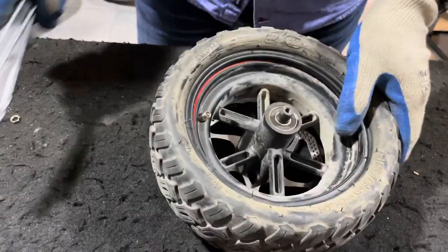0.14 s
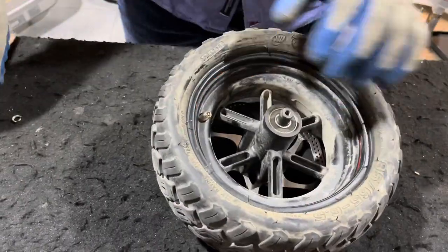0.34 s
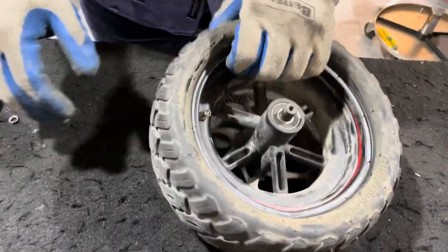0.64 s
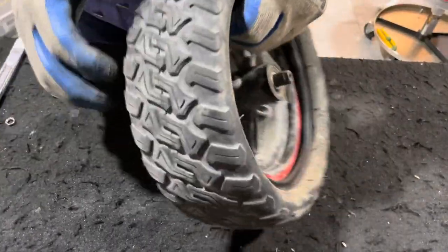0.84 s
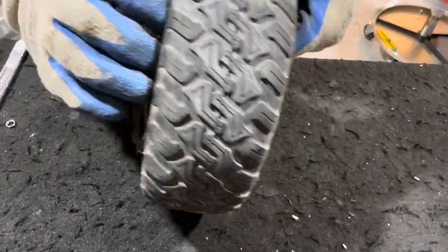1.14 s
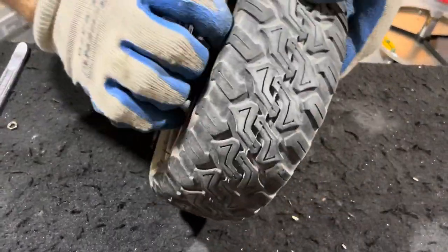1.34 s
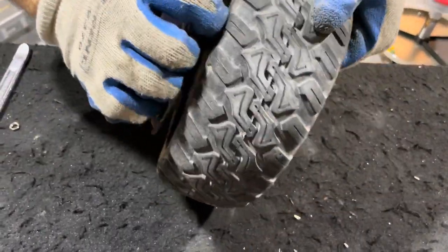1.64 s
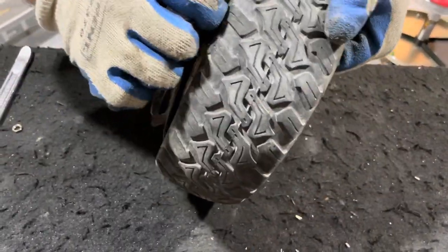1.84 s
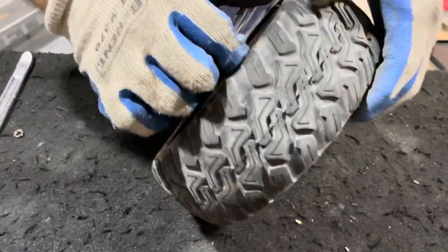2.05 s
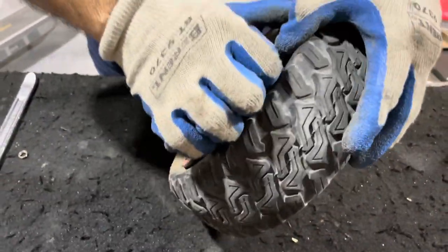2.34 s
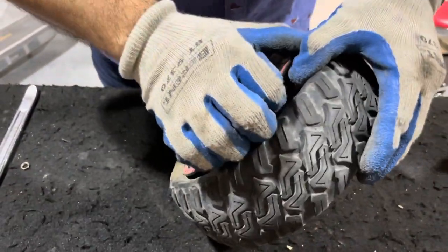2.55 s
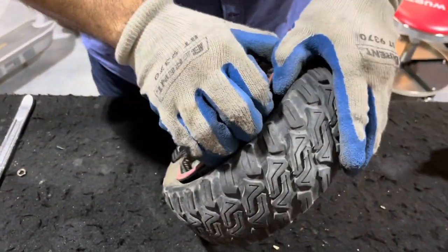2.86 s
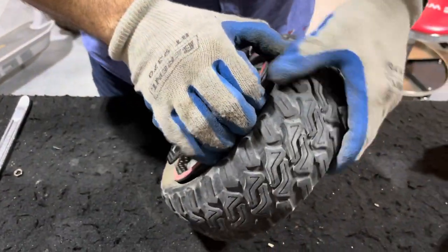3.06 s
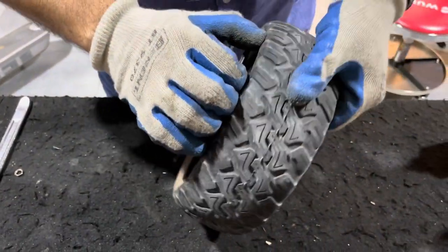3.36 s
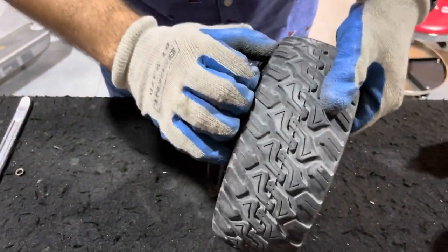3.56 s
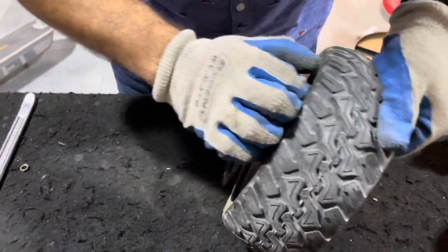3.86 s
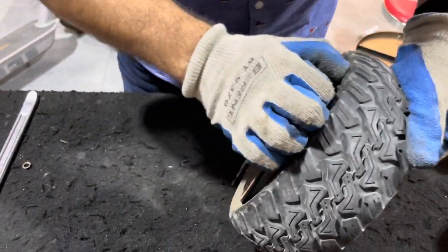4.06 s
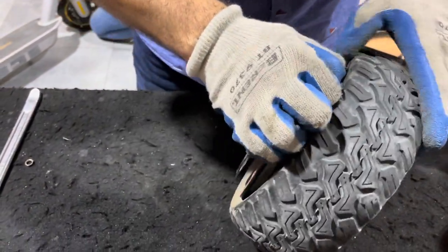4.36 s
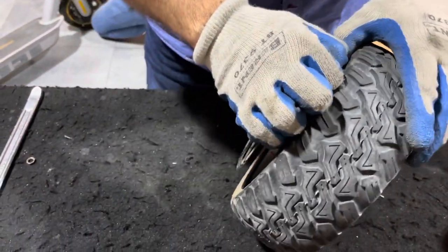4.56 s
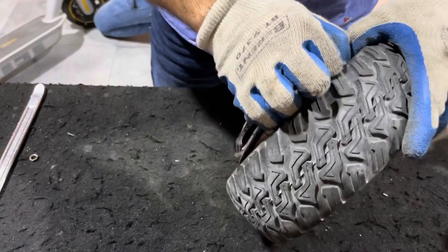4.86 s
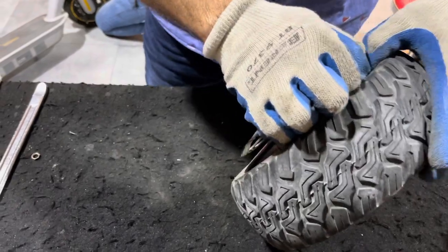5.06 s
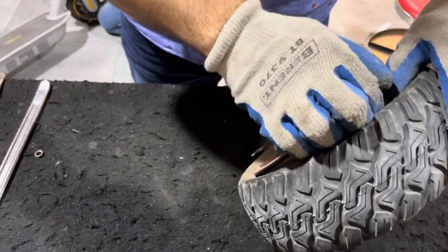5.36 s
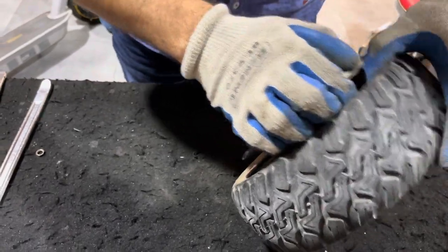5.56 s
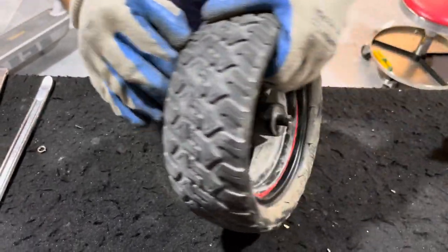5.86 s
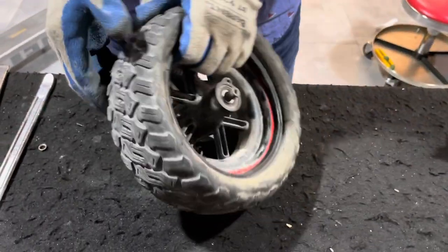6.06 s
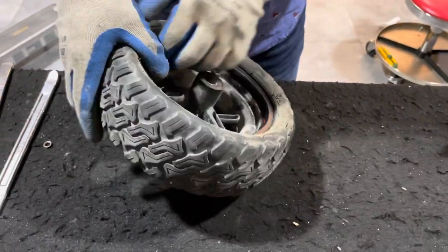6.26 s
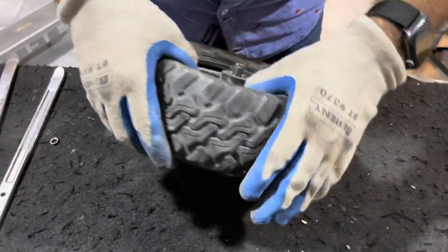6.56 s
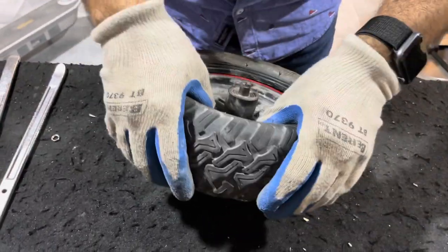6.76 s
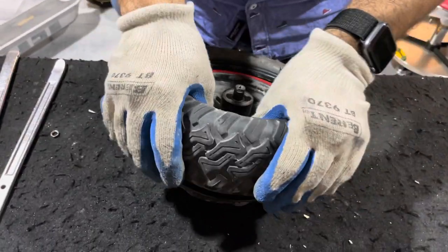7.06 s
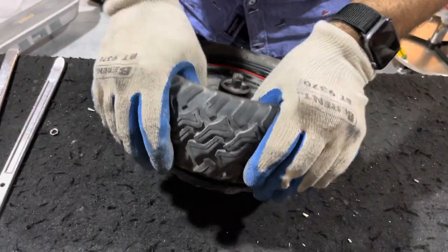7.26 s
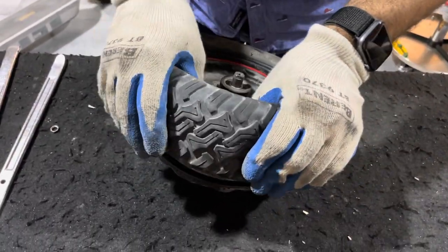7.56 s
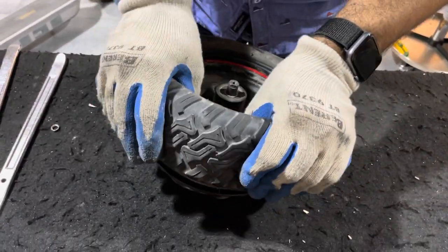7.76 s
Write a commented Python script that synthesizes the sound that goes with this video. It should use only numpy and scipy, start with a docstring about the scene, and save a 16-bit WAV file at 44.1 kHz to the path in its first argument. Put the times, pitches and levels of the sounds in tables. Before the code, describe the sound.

A loud metallic clash with a soft thump fades, followed by quiet gloved rubbing, small sharp knocks and faint rubber squeaks in a workshop.

```python
"""Tire levers and a small wheel on a padded bench

Steel levers slide together, drop on the padding and ring: friction and blows excite damped steel modes.
Gloved hands work a rubber tire off a metal rim: rubbing is grainy coloured noise, skids are chirp clusters,
and the rim's knocks at the bead are noise bursts with decaying tones. The wheel rumbles over the bench,
in a workshop of low noise and decaying echo. Automatic gain ducks under loud sound and recovers."""
import sys
import numpy as np
from scipy import signal
from scipy.fft import rfft, irfft, next_fast_len
from scipy.io import wavfile
from scipy.ndimage import uniform_filter1d, minimum_filter1d, map_coordinates

SR = 44100
rng = np.random.default_rng(int(sys.argv[2]) if len(sys.argv) > 2 else 0)


def dump(signal):
    """Clip the signal to [-1, 1] and save it as 16-bit WAV at the path in sys.argv[1]."""
    limited = np.clip(np.atleast_2d(signal).T, -1, 1)
    pcm = np.round(limited * 32767).astype(np.int16)
    wavfile.write(sys.argv[1], SR, pcm)


N = 348831  # length [samples]

# Levels are relative: each source adds its own variation, and the gain control acts on the sum.
# Workshop noise spectrum: [f/Hz, level/dB]
SHOP_COLOUR = [(15, -41), (28, -17.5), (42, -5.5), (86, -3), (128, -8.5), (163, 0.5), (213, -7.5),
               (250, -12), (404, -16.5), (588, -13), (709, -18.5), (811, -16.5), (1720, -28), (2630, -38.5),
               (10900, -62.5), (15000, -52.5)]
# Correlation of left and right in diffuse sound: [f/Hz, correlation]
ALIKE = [(60, 0.849), (150, .88), (300, 0.64), (550, -0.63), (1500, -0.42), (4000, -0.33)]
# Reverberation time of the walls: [f/Hz, t60/s]
WALLS = [(100, 0.39), (600, .9), (3000, 0.48), (6500, 0.66), (10500, .5), (14000, 0.17)]
# Wheel dragged and tipped on the bench: [start t/s, length t/s, level/dB]
DRAGS = [(-.02, 0.72, -45.5), (.37, 0.36, -32), (.63, 0.45, -47.5), (7.1, 1.4, -57)]
# Spectrum of the dragged tread: [f/Hz, level/dB]
DRAG_COLOUR = [(20, -28), (45, -5.5), (90, -4), (200, -6), (400, -15.5), (700, -16), (1500, -20.5),
               (3000, -23.5), (9000, -61)]
# Lever modes: [f/Hz, free level/dB, t60/s, held level/dB]
STEEL = [(1868, -49, 1.7, -29), (2992, -31, 1.9, -22), (3047, -25, 1.35, -21), (3134, -24, 1.8, -18),
         (4464, -24, .8, -11), (4541, -6, .61, -1), (5490, -21, .75, -11), (5717, -20, 1.05, -16),
         (5855, -36, 1.3, -20), (6212, -26, .66, -5), (6331, -12, .48, -1), (6420, -32, .3, -11),
         (8121, -8, .5, 1), (8227, -7, .5, 0), (8407, -21, .63, -13), (8512, -10, .72, -9),
         (8608, -18, .5, -9), (9000, -25, 1, -17), (9091, -22, 1.45, -19), (10430, -16, .57, -10),
         (10644, -11, .45, -8), (11277, -23, .66, -15), (11482, -21, .57, -15), (12780, -31, 1.4, -24),
         (12949, -7, .5, -7), (13168, -17, .52, -16), (14370, -42, .45, -20), (14620, -28, .52, -21),
         (15561, -18, .49, -20)]
# Steel sliding on steel: [start t/s, length t/s, level/dB, brightness/(dB per octave)]
SLIDES = [(-.01, .13, -33.5, 1), (0.095, .11, -45, -5), (0.135, 0.079, -34.5, -8), (.19, 0.25, -46.5, -6),
          (0.307, .085, -21, 3.5), (0.346, .076, -14.5, 1.5), (0.382, 0.12, -14.5, -1)]
# Spectrum of steel friction and of a clink's crack: [f/Hz, level/dB]
SCRAPE = [(100, -58), (700, -24.5), (2000, -9), (3700, -6.5), (6200, -7), (8300, -11.5), (9600, -11),
          (13000, -19.5), (15500, -32.5)]
# Steel striking steel: [t/s, level/dB, longest t60/s the grip allows, brightness/(dB per octave)]
CLINKS = [(.002, -34, .16, 5), (.147, -26, .11, -7.5), (0.3075, -22, .16, 3), (.334, -18.5, .15, 2),
          (0.3582, -5, .074, -0.5), (.366, -3, .1, -2), (.379, 0, .12, 2.5), (.441, -5.5, .16, -4.5),
          (.456, -8.5, .12, 3), (.469, -3, .18, 5.5)]
# Phase of the levers between left and right: [f/Hz, left lead/rad]
STEREO_PHASE = [(3000, -2.4), (3140, -1.8), (4500, -4.7), (5500, -1.8), (5720, 0), (6250, .8), (8200, 2.1),
                (9090, 2.5), (10500, 3.4), (11400, 3.9), (12900, 4.75), (15500, 6.3)]
# Level of the levers between left and right: [f/Hz, left minus right level/dB]
STEREO_TILT = [(3000, -1), (3130, 2), (4540, -4), (5500, -7), (5720, -11), (5860, -5), (6250, 0)]
# Gain on the part shared by left and right: [f/Hz, level/dB]
SHARED_GAIN = [(8000, 0), (9300, -19.5), (10800, -17.5), (12200, 4)]
# Soft blows on the bench: [t/s, level/dB, pitch f/Hz, slap level/dB]
THUMPS = [(0.3558, -3.5, 94.9, -2), (.638, -15.5, 80.3, -10)]
# Spectrum of a slap on the padding: [f/Hz, level/dB]
SLAP = [(20, -42.5), (60, -10), (130, 5.5), (240, 1.5), (350, 0.5), (520, 0), (900, -11), (1400, -25.5),
        (3000, -47)]
# Hands holding on, lightly, then harder: [start t/s, length t/s, rubber level/dB, glove hiss level/dB]
GRIP = [(0.887, 3.7, -75, -81), (4.406, 4.3, -70, -77)]
# Glove strokes over the tire: [start t/s, length t/s, rubber level/dB, glove hiss level/dB]
STROKES = [(1.145, 0.61, -66.5, -62.5), (1.692, 0.41, -65.5, -63), (2.126, 0.16, -61, -64.5),
           (2.58, 0.1, -65, -64), (2.97, 0.15, -65, -64), (3.417, 0.12, -60, -59),
           (3.742, 0.58, -76, -66.5), (4.422, 0.076, -73, -71), (5.031, 0.18, -77, -73),
           (5.512, 0.53, -64, -67), (6.017, 0.478, -62.5, -65), (6.444, 0.39, -64, -63.5),
           (6.765, 0.43, -73, -76), (7.153, 0.34, -73, -72), (7.616, 0.43, -66, -70.5)]
# Spectrum of rubbed rubber: [f/Hz, level/dB]
RUBBER = [(500, -0.5), (1100, -11.5), (1800, 3), (2800, -2.5), (4000, -6), (8000, -39)]
# Spectrum of glove hiss and of grit: [f/Hz, level/dB]
GLOVE = [(2000, -14), (3800, -2), (6200, 0), (8000, -2.5), (10000, -8), (13000, -9.5), (15500, -15)]
# Rim contacts: [t/s, level/dB, struck spot f/Hz, spot level/dB, thud level/dB, rim ring level/dB,
# left lag/samples, f/Hz above which rubber muffles the crack]
KNOCKS = [(1.5706, -22.5, 5070, 7, -7, -35, 6.5, 14000), (1.572, -24.5, 2676, 8, -26.5, -36, 18.5, 14000),
          (1.5773, -21, 2640, 1.5, -4, -27.5, 13, 11800), (1.5788, -25.5, 2290, 4.5, -25, -34, 10, 12000),
          (2.417, -53, 700, 0.5, -13, -27, 6.5, 3000), (3.265, -24, 1304, -3.5, -6, -33, -22.5, 12000),
          (3.2661, -30, 5433, 8.5, -19.5, -26, -21, 12000), (3.268, -26.5, 4380, 5, -7, -21, -18.5, 12000),
          (4.173, -51, 1900, 1, -8.5, -36, 4.5, 2410), (4.19, -49.5, 1234, -6.5, -13, -35, 3, 2408),
          (4.5421, -49, 2103, 0, -13, -39.5, 16.5, 3480), (5.157, -51, 1480, -3, -13, -35, 5, 2397),
          (5.701, -48.5, 1400, 4.5, -8.5, -38.5, -27, 2780),
          (6.548, -46.5, 1683, -6, -13.5, -36, -25.5, 5030),
          (6.714, -43.5, 2494, 11.5, -7.5, -32, -23.5, 4510), (6.714, -50.5, 4300, 11, -15, -25, -28, 5010),
          (6.739, -57, 2400, 7, -10, -35, -23, 3000)]
# Spectrum of a knock's crack: [f/Hz, level/dB]
KNOCK_COLOUR = [(20, -45), (70, -38), (150, 0.5), (400, 1), (650, 1.5), (850, -5.5), (1150, 2.5),
                (1800, -1), (2100, -13.5), (2700, -7.5), (3600, -9), (5000, -4.5), (6500, -2), (8200, -20),
                (12500, -13.5), (15000, -37)]
# Tire thud partials: [f/Hz, level/dB, t60/s]
THUD = [(165, -8, .04), (291, 0, .036), (435, -10, .03), (578, 0, .045), (720, -11, .03), (1160, -1, .025)]
# Rim modes: [f/Hz, level/dB, t60/s]
RIM = [(1240, -10, .11), (2660, -14, .4), (4113, -11, .36), (4385, -5, .33), (4420, 0, .38), (4452, -1, .6),
       (5308, -10, .35), (5420, -5, .4), (5459, 0, .55), (6282, -9, .35), (6578, -7, .58)]
# Specks of grit cracking: [t/s, level/dB]
SPECKS = [(2.1394, -51.5), (5.2894, -63.5), (5.8794, -49), (7.0928, -48), (7.2758, -52), (7.5537, -63)]
# Rubber skids: [start t/s, length t/s, starting f/Hz, level/dB]
SKIDS = [(4.45, 0.12, 3060, -70.5), (4.54, 0.12, 2450, -66.5), (4.628, 0.16, 1846, -65.5),
         (5.243, 0.16, 2895, -69.5), (5.521, 0.043, 3706, -63.5), (5.56, 0.057, 3250, -63),
         (5.626, 0.056, 1870, -55), (6.174, 0.12, 5440, -62.5), (6.224, 0.081, 3540, -56.5),
         (6.321, 0.089, 3610, -58.5), (6.475, 0.16, 3230, -59.5), (6.497, 0.15, 6170, -60),
         (6.751, .08, 2610, -63), (6.828, 0.117, 5490, -64), (6.857, 0.18, 3180, -64),
         (7.139, 0.23, 3375, -61.5), (7.381, .1, 3850, -65.5), (7.417, 0.16, 2710, -65)]
# Broad swishes as the tire shifts: [start t/s, length t/s, level/dB]
SWISHES = [(5.704, .074, -49), (5.787, 0.074, -50.5), (7.642, 0.074, -46.5)]
# Spectrum of a swish: [f/Hz, level/dB]
SWISH_COLOUR = [(600, -31), (1700, -24), (2700, -4.5), (4200, -7.5), (5300, 2.5), (6600, -8), (9000, -15),
                (13000, -29)]

SHOP_DB = -50.5
DRAG_ATTACK_S, DRAG_RELEASE_S = .03, .35
BRIGHTNESS_PIVOT_HZ = 6000
SLIDE_ATTACK_S, SLIDE_RELEASE_S = 0.0068, 0.08
SING_DB, GRIT_DB = -0.5, -13.5  # sliding: modes set singing, and the bare friction noise
CHOKED_T60 = .05  # longest decay of a mode choked by sliding [s]
GRIP_DETUNE = 0.0047  # largest fraction by which contact pulls a mode off pitch while sliding
CLINK_RISE_S, CRACK_DB, CRACK_T60 = .002, -14, .012  # rise t60 [s]; crack relative to ring [dB], t60 [s]
FREE_S, FREE_DB = .379, 2  # when one lever is let go [s], and how hard it rings [dB]
CONTACT_S = .008  # t60 of the free ring's build-up [s]
ROCK_DB, ROCK_PER_S = 1.8, 11  # flutter depth [dB], random knots per second
STROKE_ATTACK_S, STROKE_RELEASE_S = 0.069, 0.13
TICKS_PER_S, TICK_DB, TICK_SPREAD_DB, TICK_T60 = 5.6, -68, 4.5, .012
RIM_LOWEST_HZ = 113  # the knocks carry little sound below this [Hz]
SPECK_T60 = .006  # [s]
SAG_OCTAVES_PER_S = 2.1  # a squeak sinks as the tension eases
CHIRPS_PER_S, CHIRP_S, CHIRP_SCATTER_OCTAVES, CHIRP_SPREAD_DB = 550, .008, .14, 3
# How much of each source the walls return [dB]
WET_STEEL_DB, WET_THUMP_DB, WET_KNOCK_DB, WET_SKID_DB, WET_RUB_DB = -22.5, -2.5, -14.5, -1, -5.5
TOP_HZ = 15900  # upper band limit


def amp(db):
    """Level law: decibels to amplitude ratio."""
    return 10 ** (np.asarray(db) / 20)


def unit(x):
    """Normalization: scale to rms 1."""
    return x / np.sqrt(np.mean(x ** 2) + 1e-20)


def fade(t, t60):
    """Exponential damping: a fall of 60 dB in t60 seconds."""
    return np.exp(-np.log(1000) * t / t60)


def along(points, hz):
    """Interpolation of (Hz, value) points on a logarithmic frequency axis."""
    f, v = np.transpose(points)
    return np.interp(np.log(hz + 1), np.log(f), v)


def clock(seconds):
    """Sampling: the sample times of an interval."""
    return np.arange(int(seconds * SR)) / SR


def add(track, s, x):
    """Superposition: mix x into the track at time s."""
    start = max(0, round(s * SR))
    track[..., start:start + x.shape[-1]] += x[..., :N - start]


def wobble(rate):
    """Random modulation: a smooth curve with rate knots a second."""
    knots = rng.standard_normal(int(N * rate / SR) + 4)
    return map_coordinates(knots, [np.arange(N) * rate / SR])


def filtered(x, response):
    """Linear filtering: the spectrum of x times a response of frequency."""
    n = x.shape[-1]
    m = next_fast_len(n + 8192)
    spectrum = rfft(x, m) * response(np.fft.rfftfreq(m, 1 / SR))
    return irfft(spectrum, m)[..., :n]


def noise(colour, size):
    """Spectral shaping: coloured noise of rms 1."""
    return unit(filtered(rng.standard_normal(size), lambda hz: amp(along(colour, hz))))


def diffuse(colour):
    """Interchannel coherence: mid and side noise in the proportions that give the ALIKE correlation."""
    def mid_side_gains(hz):
        angle = np.arccos(np.clip(along(ALIKE, hz), -1, 1)) / 2
        return np.array([np.cos(angle), np.sin(angle)])
    mid, side = filtered(noise(colour, (2, N)), mid_side_gains)
    return unit(np.array([mid + side, mid - side]))


def gestures(rows, attack, release):
    """Amplitude envelopes of (start, length, dB) movements: each rises, holds and dies away in its length."""
    now = np.arange(N) / SR
    ramp = lambda u: np.sin(np.pi / 2 * np.clip(u, 0, 1))
    return sum(amp(db) * ramp((now - s) / attack) * ramp((s + length - now) / release)
               for s, length, db in rows)


def swell(t, length):
    """Asymmetric envelope: a quick rise and a slower fall."""
    return np.sin(np.pi * (t / length) ** 0.58)


def ring(modes, t, longest, brightness_db=0, detune=0):
    """Modal synthesis: damped (Hz, dB, t60) modes of random strength, wavering as the metal rocks."""
    hz, db, t60 = np.transpose(modes)[:, :, None]
    strength, phase, pace, pull = rng.random((4,) + hz.shape)
    gain = amp(db + 4 * strength + brightness_db * np.log2(hz / BRIGHTNESS_PIVOT_HZ))
    rocking = amp(2.5 * np.sin(2 * np.pi * (3 + 7 * pace) * t))
    pulled_hz = hz * (1 + detune * (2 * pull - 1))
    waves = np.sin(2 * np.pi * (pulled_hz * t + phase)) * rocking * fade(t, np.minimum(t60, longest))
    return (gain * waves).sum(0) / np.sqrt(np.sum(gain ** 2) / 2)  # starts near rms 1


def workshop():
    """Diffuse background noise: the low rumble of the shop, its level wavering slightly."""
    return amp(SHOP_DB + 0.79 * wobble(7.0)) * diffuse(SHOP_COLOUR)


def dragging():
    """Rolling and sliding noise: tread rumbles over the padded top while the wheel is moved."""
    return gestures(DRAGS, DRAG_ATTACK_S, DRAG_RELEASE_S) * amp(3.5 * wobble(27)) * diffuse(DRAG_COLOUR)


def slides():
    """Friction excitation: gritty sliding keeps choked steel modes singing, a little off pitch each time."""
    out = np.zeros(N)
    held = np.array(STEEL)[:, [0, 3, 2]]
    friction = noise(SCRAPE, N) * amp(1.2 * wobble(400) + 2.7 * wobble(70))
    for s, length, db, brightness_db in SLIDES:
        push = friction * gestures([(s, length, db)], SLIDE_ATTACK_S, SLIDE_RELEASE_S)
        choked = ring(held, clock(.1), CHOKED_T60, brightness_db, GRIP_DETUNE)
        singing = signal.oaconvolve(push, choked / np.linalg.norm(choked))[:N]
        out += amp(SING_DB) * singing + amp(GRIT_DB) * push
    return out


def clinks():
    """Impact excitation: levers strike, their modes damped by the hand and each other."""
    out = np.zeros(N)
    held = np.array(STEEL)[:, [0, 3, 2]]
    for s, db, longest, brightness_db in CLINKS:
        t = clock(min(longest, 2))
        detune = GRIP_DETUNE * CHOKED_T60 / longest  # a looser grip pulls less
        tone = ring(held, t, longest, brightness_db, detune) * (1 - fade(t, CLINK_RISE_S))
        crack = noise(SCRAPE, len(t)) * fade(t, CRACK_T60)
        add(out, s, amp(db) * (tone + amp(CRACK_DB) * crack))
    return out


def free_ring():
    """Free vibration: a lever at rest on the padding rings out, each mode fluttering as it rocks."""
    out, t = np.zeros(N), clock(1.8)
    knots = np.arange(len(t)) * ROCK_PER_S / SR
    tone = np.zeros(len(t))
    for hz, db, t60, _ in STEEL:
        wave = np.sin(2 * np.pi * (hz * t + rng.random())) * fade(t, t60)
        flutter = amp(ROCK_DB * map_coordinates(rng.standard_normal(int(knots[-1]) + 4), [knots]))
        tone += amp(db) * wave * flutter
    add(out, FREE_S, amp(FREE_DB) * tone * (1 - fade(t, CONTACT_S)))
    return out


def levers():
    """Interchannel phase and level: the levers' sound, spread over left and right by frequency."""
    def left_and_right(hz):
        half = np.exp(.5j * along(STEREO_PHASE, hz)) * amp(along(STEREO_TILT, hz) / 2)
        pair = np.array([half, 1 / half])
        return pair / np.sqrt(np.mean(np.abs(pair) ** 2, axis=0))
    return filtered(clinks() + slides() + free_ring(), left_and_right)


def room(x):
    """Reverberation: convolution with a noise tail whose every frequency decays at its own speed."""
    hz, t, z = signal.stft(rng.standard_normal((2, SR)), SR, nperseg=256)
    tail = signal.istft(z * fade(t, along(WALLS, hz)[:, None]), SR, nperseg=256)[1]
    tail = tail * (1 - fade(np.arange(tail.shape[1]) / SR, 0.0087))  # gradual onset
    return signal.fftconvolve(x, tail / np.linalg.norm(tail[0]), axes=1)[:, :N]


def widened(x):
    """Common-mode gain: the part shared by left and right is weakened near 10 kHz, leaving it wide there."""
    return x + filtered(x.mean(0), lambda hz: amp(along(SHARED_GAIN, hz)) - 1)


def bench():
    """Damped oscillation: the padded top answers a blow with a slap and a few low swings."""
    out, t = np.zeros(N), clock(0.1)
    for s, db, hz, slap_db in THUMPS:
        swing = -(np.sin(2 * np.pi * hz * t) + 0.51 * np.sin(2 * np.pi * 1.7 * hz * t))
        swing = swing * fade(t, 0.05) * (1 - fade(t, 0.0079))
        slap = noise(SLAP, len(t)) * fade(t, 0.12) * (1 - fade(t, 0.093))
        add(out, s, amp(db) * (swing + amp(slap_db) * slap))
    return out


def ticks():
    """Random impulses: now and then a tread block flicks off the glove."""
    out, t = np.zeros((2, N)), clock(0.091)
    for when, chance in rng.random((int(TICKS_PER_S * N / SR), 2)):
        gain = amp(TICK_DB - TICK_SPREAD_DB * np.log(chance + .05))
        add(out, when * N / SR, gain * noise(RUBBER, (2, len(t))) * fade(t, TICK_T60))
    return out


def patchy(x, depth_db):
    """Time-frequency modulation: short-lived peaks of colour, as single tread blocks catch and sing."""
    z = signal.stft(x, nperseg=512)[2]
    field = uniform_filter1d(rng.standard_normal(z.shape[1:]), size=4, axis=0)
    field = uniform_filter1d(field, size=8, axis=1)
    return unit(signal.istft(z * amp(depth_db * unit(field)), nperseg=512)[1][:, :N])


def rubbing():
    """Granular friction: gloves drag over the tread, catching and letting go in small grains."""
    moves = np.array(STROKES + GRIP)
    rubber = gestures(moves[:, [0, 1, 2]], STROKE_ATTACK_S, STROKE_RELEASE_S)
    glove = gestures(moves[:, [0, 1, 3]], STROKE_ATTACK_S, STROKE_RELEASE_S)
    grain = unit(amp(2.8 * wobble(45) + 1.5 * wobble(500)))
    squeak = patchy(diffuse(RUBBER), 4.5)
    hiss = patchy(diffuse(GLOVE), 2.5)
    return grain * (rubber * squeak + glove * hiss)


def rim():
    """Impact response: the rim snaps past the bead with a crack, a tire thud and a faint metal ring."""
    out, t = np.zeros((2, N)), clock(.6)
    thud = sum(amp(db) * np.sin(2 * np.pi * hz * t) * fade(t, t60) for hz, db, t60 in THUD)
    for s, db, hz, spot_db, thud_db, ring_db, lag, muffle_hz in KNOCKS:
        crack = filtered(noise(KNOCK_COLOUR, (3, len(t))), lambda f: 1 / (1 + (f / muffle_hz) ** 4))
        crack = crack * fade(t, 0.029)
        spot = amp(spot_db) * np.sin(2 * np.pi * hz * t) * fade(t, .018)
        knock = crack[2] + spot + amp(thud_db) * thud + amp(ring_db) * ring(RIM, t, longest=1)
        # The right side is 4 dB stronger; each side also has some crack of its own.
        add(out[0], s + lag / SR / 2, amp(db - 3.0) * (knock + .5 * crack[0]))
        add(out[1], s - lag / SR / 2, amp(db + 1.0) * (knock + .5 * crack[1]))
    return signal.sosfilt(signal.butter(2, RIM_LOWEST_HZ, 'highpass', fs=SR, output='sos'), out)


def grit():
    """Brittle fracture: specks of grit crack under the tread as tiny, bright clicks."""
    out, t = np.zeros((2, N)), clock(.02)
    for s, db in SPECKS:
        add(out, s, amp(db) * noise(GLOVE, (2, len(t))) * fade(t, SPECK_T60))
    return out


def slip(length, start_hz):
    """Stick-slip: a cluster of brief chirps, as tread blocks catch and let go, sinking in pitch."""
    t = clock(length)
    count = int(CHIRPS_PER_S * length)
    when, *phases = rng.random((count, 3)).T[:, :, None]  # one set of phases per channel
    pitch, size = rng.standard_normal((count, 2)).T[:, :, None]
    sinking_cycles = np.cumsum(start_hz * 2 ** (-SAG_OCTAVES_PER_S * t)) / SR
    cycles = sinking_cycles * 2 ** (CHIRP_SCATTER_OCTAVES * pitch)
    bursts = amp(CHIRP_SPREAD_DB * size) * np.exp(-((t - when * length) / CHIRP_S) ** 2)
    pair = [(bursts * np.sin(2 * np.pi * (cycles + phase))).sum(0) for phase in phases]
    return swell(t, length) * unit(np.array(pair))


def skids():
    """Stick-slip friction: sliding rubber half squeaks in a narrow band or swishes in a wide one."""
    out = np.zeros((2, N))
    for s, length, hz, db in SKIDS:
        add(out, s, amp(db) * slip(length, hz))
    for s, length, db in SWISHES:
        t = clock(length)
        add(out, s, amp(db) * swell(t, length) * noise(SWISH_COLOUR, (2, len(t))))
    return out * unit(amp(1.5 * wobble(60) + 1.5 * wobble(350)))


def scene():
    """Superposition: all the work at the bench, with the walls' echo and the shop."""
    steel, thump, knock, skid, rub = levers(), bench(), rim(), skids(), rubbing()
    sent = amp(WET_STEEL_DB) * steel + amp(WET_THUMP_DB) * thump + amp(WET_KNOCK_DB) * knock
    sent = sent + amp(WET_SKID_DB) * skid + amp(WET_RUB_DB) * rub
    contacts = thump + knock + skid + rub + dragging() + ticks() + grit()
    return steel + widened(contacts + room(sent) + workshop())


def gain_control(x, threshold_db, attack, hold, release_db):
    """Dynamic compression: loud sound pulls the gain down; it waits, then climbs release_db a second."""
    smooth = lambda v, s: signal.lfilter([1 / (s * SR)], [1, 1 / (s * SR) - 1], v)
    level_db = 10 * np.log10(smooth(np.mean(x ** 2, axis=0), 0.039) + 1e-12)
    half = int(hold * SR / 2)
    # The lowest gain called for within the past hold time
    wanted = minimum_filter1d(np.minimum(threshold_db - level_db, 0), 2 * half + 1, origin=half)
    climb = release_db * np.arange(N) / SR
    gain_db = np.minimum.accumulate(wanted - climb) + climb
    return x * amp(smooth(gain_db, attack))


def record(dry):
    """Compression, saturation and band limiting: automatic gain, a soft ceiling, then a sharp low-pass."""
    held = gain_control(dry, threshold_db=-20.5, attack=0.0025, hold=0.1, release_db=89)
    held = held / (1 + (held / .85) ** 4) ** .25
    return filtered(held, lambda hz: hz < TOP_HZ)


dry = scene()
out = record(dry)
dump(out)
```